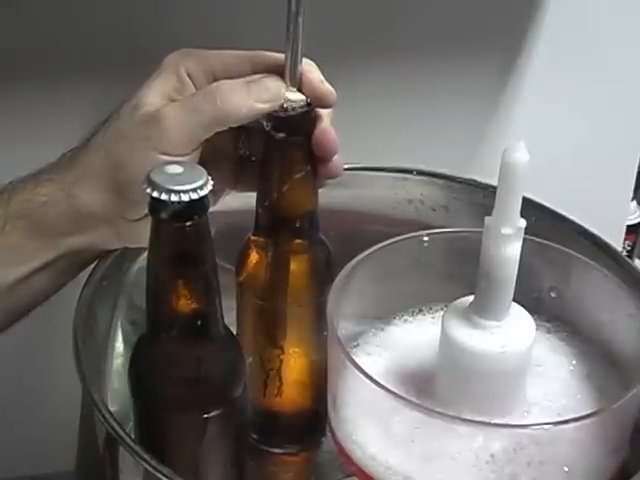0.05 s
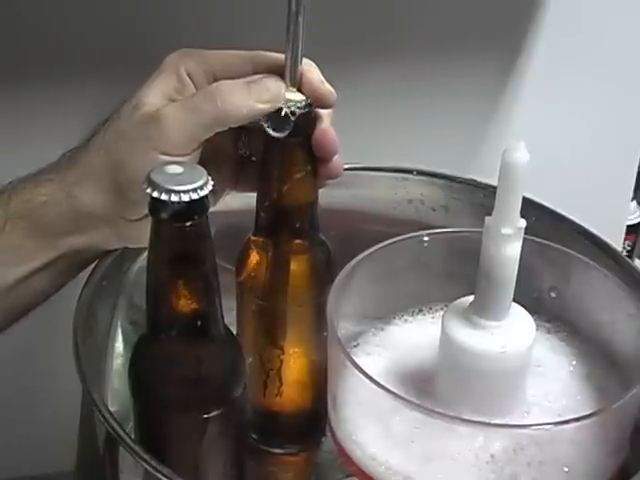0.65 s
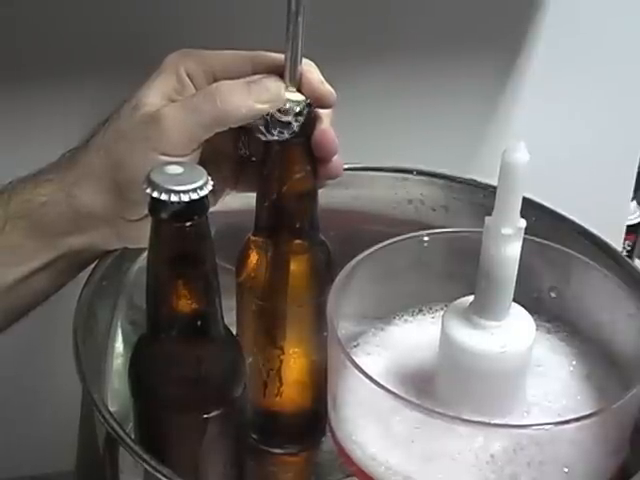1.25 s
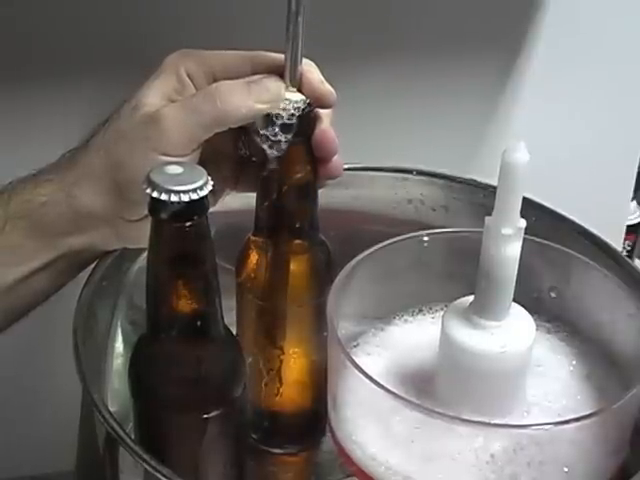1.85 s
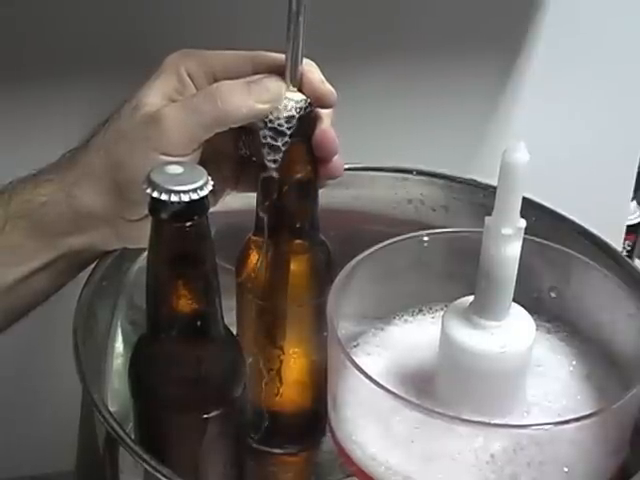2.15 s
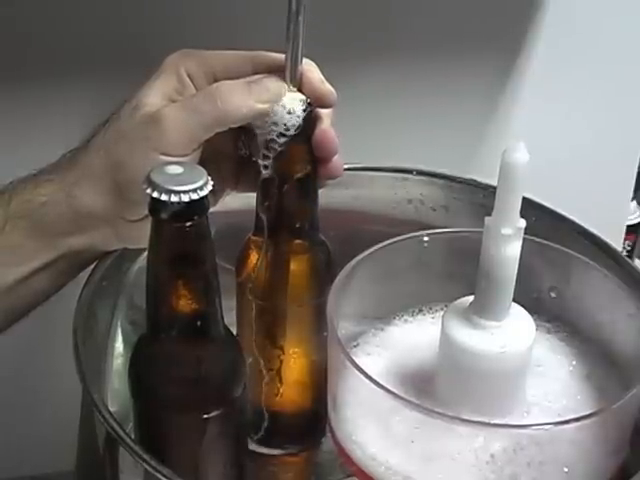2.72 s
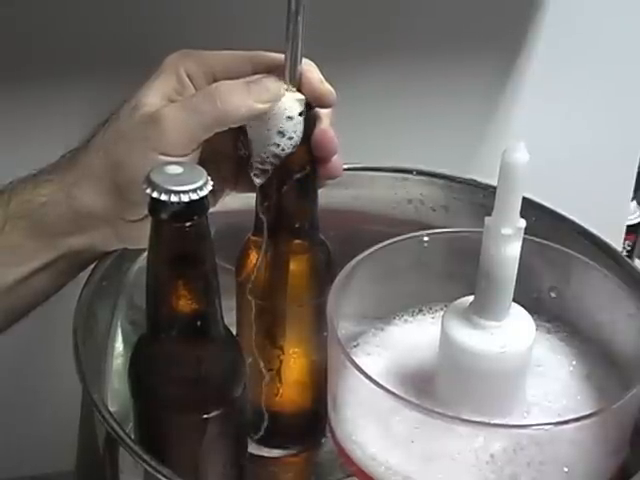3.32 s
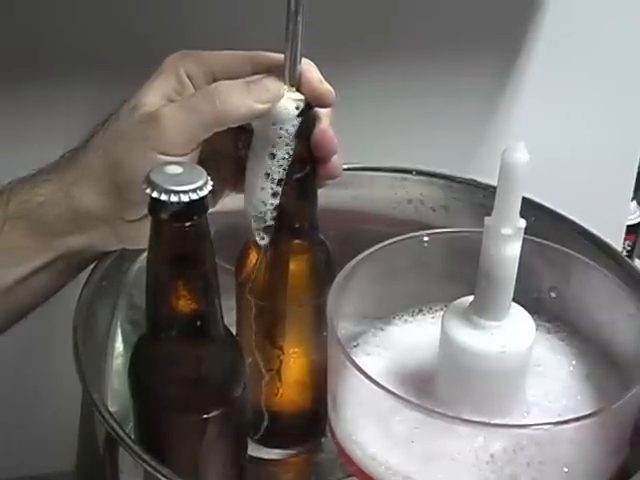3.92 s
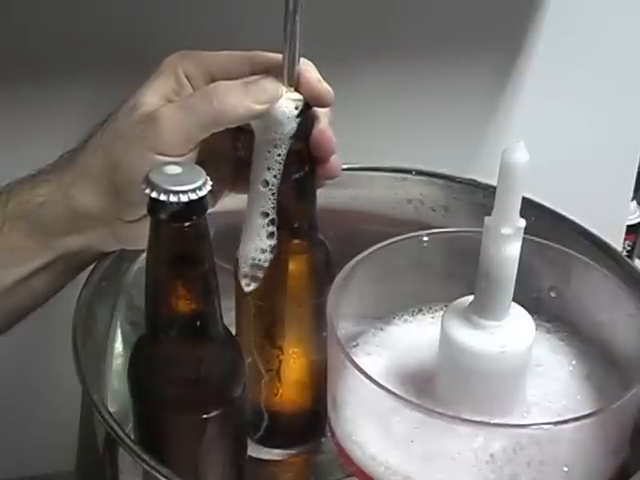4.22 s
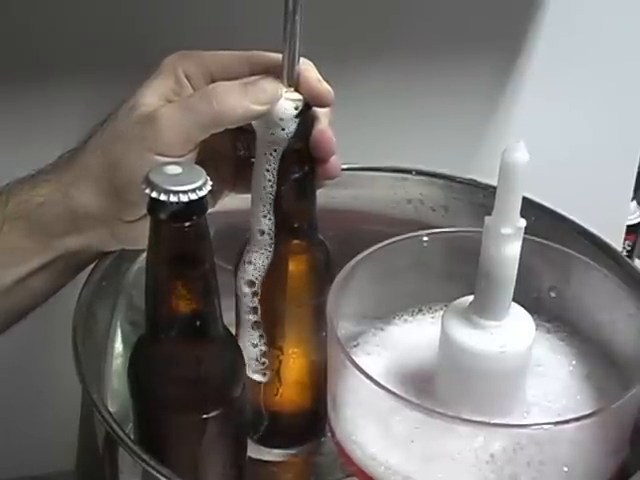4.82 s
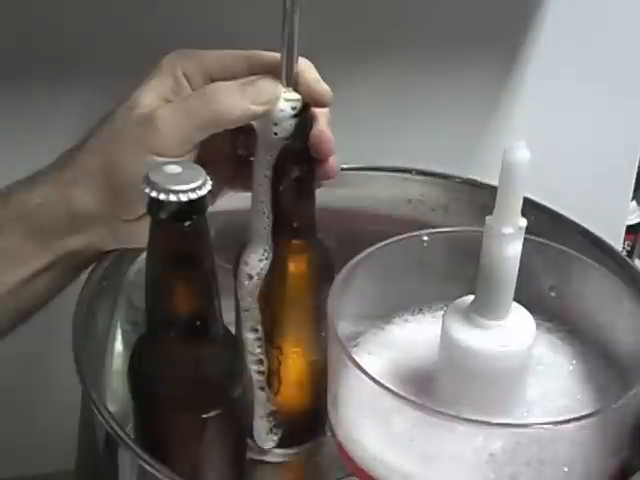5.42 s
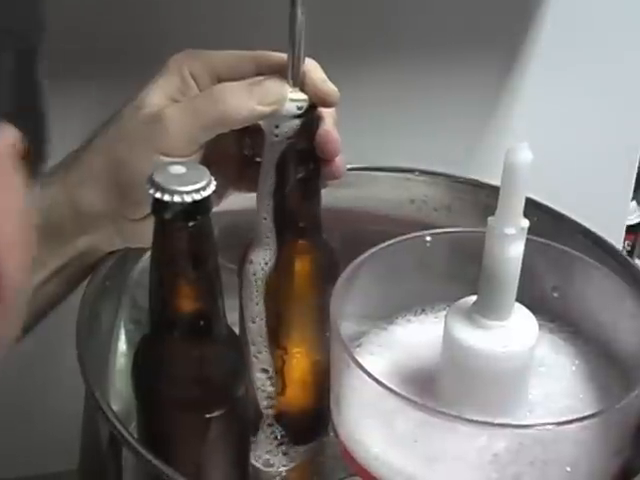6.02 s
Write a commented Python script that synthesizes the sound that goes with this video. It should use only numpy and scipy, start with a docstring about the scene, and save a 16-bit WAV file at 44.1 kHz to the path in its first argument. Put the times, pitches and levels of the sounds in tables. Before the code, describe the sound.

Gas sputters and hisses out of a glass bottle being filled, turning to crackling foam and fading to a thin whistle.

```python
"""An appliance hums in a small room while a beer bottle is filled from a tap tube inside a steel tub.
A thumb holds the stopper in, and gas escapes past it in a sputtering, spitting hiss.
Foam creeps into the gap: the hiss turns to crackle, the neck rings, foam gulps out and bubbles pop.
As the pressure runs down, the last gas fades with a thin whistle through a pinhole.
Then an arm brushes past and a few short hisses follow."""
import sys
import numpy as np
from scipy import signal
from scipy.fft import rfft, irfft, next_fast_len
from scipy.io import wavfile
from scipy.ndimage import map_coordinates

SR = 44100
rng = np.random.default_rng(int(sys.argv[2]) if len(sys.argv) > 2 else 0)


def generate_wav(sig):
    """Save sig (samples, or channels by samples) to the path in sys.argv[1] as 16-bit PCM at SR."""
    pcm = np.round(np.clip(np.atleast_2d(sig).T, -1, 1) * 32767).astype(np.int16)
    wavfile.write(sys.argv[1], SR, pcm)


N = 272097
TIME = np.arange(N) / SR
TOP_HZ = 15700


def amp(db):
    """Turns decibels into a gain."""
    return 10 ** (np.asarray(db) / 20)


def unit(x):
    """Scales x to an average strength (rms) of 1."""
    return x / np.sqrt(np.mean(x ** 2) + 1e-20)


def along(points, hz):
    """Reads between (frequency, value) points on a log frequency axis."""
    f, values = np.transpose(points)
    return np.interp(np.log(hz + 1), np.log(f), values)


def bell(x, centre, width, order=2):
    """A smooth bump of height 1; higher orders have flatter tops."""
    return .5 ** (np.abs(2 * (x - centre) / width) ** order)


def ramp(start, end):
    """0 before start, rising evenly to 1 at end."""
    return np.clip((TIME - start) / (end - start), 0, 1)


def wobble(rate):
    """A smooth curve through rate random values a second."""
    return map_coordinates(rng.standard_normal(int(N * rate / SR) + 4), [TIME * rate])


def noise():
    """White noise in two rows: mid (shared by both ears) and side (their difference)."""
    return rng.standard_normal((2, N))


def filtered(x, response):
    """Scales each frequency in x by response(hz)."""
    size = next_fast_len(N + SR // 2)
    return irfft(rfft(x, size) * response(np.fft.rfftfreq(size, 1 / SR)), size)[..., :N]


def coloured(x, spectrum):
    """Shapes x with a spectrum, at rms 1."""
    return unit(filtered(x, lambda hz: amp(along(spectrum, hz))))


def ringing(x, modes):
    """Passes x through resonances, at rms 1."""
    def response(f):
        return sum((-1) ** k * amp(db) * 1j * f * width / (hz * hz - f * f + 1j * f * width)
                   for k, (hz, width, db) in enumerate(modes))
    return unit(filtered(x, response))


def room(air_db=-46):
    """An appliance runs throughout: steady fan noise and a slightly wavering hum."""
    # motor and mains tones: f/Hz, level/dB
    tones = [(59.2, -50), (118.6, -54.5), (167.5, -47), (211, -54), (280, -55.5), (361, -56),
             (413.5, -56.5)]
    # fan noise spectrum: f/Hz, gain/dB
    spectrum = [(35, -26), (78, -27), (105, -1), (140, -9.5), (180, -1), (240, 1.5), (310, -6.5), (450, -4),
                (560, -11.5), (820, -8.5), (920, -12), (1100, -12.5), (1700, -17.5), (2200, -16.5),
                (12000, -28.5), (14500, -46)]
    hum = 0
    for hz, db in tones:
        gain = amp(db + 0.19 * wobble(2.93))
        hum += gain * np.sin(2 * np.pi * hz * TIME + 0.0022 * hz * wobble(5))
    return amp(air_db) * coloured(noise(), spectrum) + np.array([hum, np.zeros(N)])


def voice_db(dry_db, wet_gain_db, flow_power):
    """Level of one part of the leak, as foam wets the gap and the gas flow runs down."""
    # gas flow, falling with the pressure: t/s, level/dB
    flow = [(2.1, -17), (2.48, -22.5), (2.82, -22.5), (2.845, -23.5), (3.0, -24), (3.68, -29.5),
            (3.78, -35), (3.96, -34), (3.99, -31.5), (4.08, -38), (4.33, -45.5), (4.75, -47.5), (5.1, -56)]
    times, levels = np.transpose(flow)
    flow_db = np.interp(TIME, times, levels) - 28 * np.maximum(TIME - times[-1], 0)  # then dies away
    wetness = ramp(0.57, 2.64)
    return dry_db + wet_gain_db * wetness + flow_power * (flow_db - flow_db[0])


def fizz(rate, spread_db, share, size=40):
    """Rushing gas mixed with tiny bursting films, each a brief ring of its own pitch."""
    when, pitch, strength, phase = rng.random((int(rate * N / SR), 4)).T[:, :, None]
    k = np.arange(size)
    fades = amp(spread_db * strength ** 2) * np.exp(-np.pi * k / size)
    grains = fades * np.sin(2 * np.pi * (pitch * TOP_HZ * k / SR + phase))
    places = (when * N).astype(int) + k
    clicks = np.bincount(places.ravel(), grains.ravel(), N + size)[:N]
    pair = unit(np.array([clicks, np.roll(clicks, size)]))
    return np.sqrt(share) * pair + np.sqrt(1 - share) * noise()


def shifting(x, depth_db, width_hz=280, length_s=.045):
    """The wet gap keeps changing shape, so narrow peaks wander through the hiss."""
    hz, t, slices = signal.stft(x, SR, nperseg=512)
    where = np.meshgrid(hz / width_hz, t / length_s, indexing="ij")
    peaks = map_coordinates(rng.standard_normal(slices.shape[1:]), where, mode="nearest")
    return unit(signal.istft(slices * amp(depth_db * peaks), SR, nperseg=512)[1][:, :N])


def crackle(rate=130, length_s=0.00325):
    """Films tear at random moments, each letting a surge of gas through; gives a level curve."""
    tears = (rng.random(N) < rate / SR) * 1.0
    pulse = bell(TIME[:SR // 20], 1 / 40, length_s)
    surges = np.tanh(signal.fftconvolve(tears, pulse, "same"))
    return unit(surges - surges.mean())


def jet(change_db):
    """Gas rushing through the gap makes the main hiss."""
    # hiss spectrum: f/Hz, gain/dB
    spectrum = [(400, -58), (1300, -12.5), (2900, -11), (3300, -0.7), (4600, 3.5), (7600, 0.5), (9500, -7),
                (12000, -15), (16000, -46)]
    level_db = voice_db(dry_db=-22.5, wet_gain_db=0.099, flow_power=1.095) + change_db
    hiss = shifting(fizz(rate=3800, spread_db=11, share=0.42), depth_db=1.75)
    return amp(level_db) * coloured(hiss, spectrum)


def spray(change_db):
    """Spray adds a high sizzle that weakens as foam fills the gap."""
    # sizzle spectrum: f/Hz, gain/dB
    spectrum = [(3000, -44), (7000, 0), (9400, 2.5), (11200, 1.5), (12800, 0.5), (14800, -7), (15700, -31)]
    level_db = voice_db(dry_db=-22.5, wet_gain_db=-13, flow_power=0.79) + change_db
    sizzle = shifting(fizz(rate=3200, spread_db=10, share=0.48), depth_db=3.5)
    return amp(level_db) * coloured(sizzle, spectrum)


def leak():
    """Gas tears past the stopper; jet, spray, foam, neck and bottle share one sputtering flow."""
    # liquid briefly plugs the gap: t/s, length/s, jet dip/dB, spray dip/dB
    chokes = [(0.041, 0.068, 4, -1), (0.136, 0.042, 4.5, -0.5), (0.209, 0.013, 5, 4), (0.253, .022, 3, 9),
              (0.613, 0.076, 4, 11), (0.658, 0.011, 6, 8), (0.859, 0.043, 3.5, -0.5), (0.901, .045, -2, 8),
              (0.994, 0.034, -2.5, 11), (1.04, .03, 4.5, 3), (1.09, 0.041, 7, -3)]
    jet_dip_db = sum(db * bell(TIME, s, length, order=4) for s, length, db, _ in chokes)
    spray_dip_db = sum(db * bell(TIME, s, length, order=4) for s, length, _, db in chokes)
    sputter = np.interp(TIME, [2.6, 4.4], [1, .7])  # calms as the pressure is spent
    surge = crackle() * np.interp(TIME, [1.2, 2.2, 4.4], [.3, 1, .6])  # grows as foam arrives
    flow = amp(sputter * (0.28 * wobble(55) + 1.4 * wobble(230)))
    hiss = jet(1.8 * surge - jet_dip_db)
    hiss += spray(2.7 * surge + 2.6 * sputter * wobble(90) - spray_dip_db)
    hiss += foam(0.67 * surge + 0.53 * wobble(40))
    return flow * (hiss + neck() + bottle_ring())


def spits(width_hz=1000, flutter=0.23):
    """The gap blows clear in sudden spits that ring at its pitch while the liquid flutters."""
    # spits: t/s, length/s, f/Hz, level/dB
    clearings = [(0.037, .02, 12500, -24), (0.284, .025, 4770, -27), (0.468, .1, 5000, -29),
                 (0.641, 0.019, 4500, -23), (0.655, 0.04, 14200, -23), (0.689, 0.025, 5960, -19),
                 (0.722, .012, 7250, -24), (0.758, 0.016, 5000, -22), (0.805, 0.032, 7750, -25),
                 (0.905, 0.021, 4950, -23), (.908, .024, 7440, -24), (0.944, 0.016, 11600, -22),
                 (0.983, 0.039, 5150, -29), (1.094, 0.063, 10050, -24), (1.246, .11, 7650, -24),
                 (1.584, 0.19, 9250, -32), (1.728, .015, 12900, -23), (1.895, .05, 14000, -34),
                 (2.803, .035, 11800, -34), (5.353, .005, 9200, -47)]
    spurts = 0
    for s, length, hz, db in clearings:
        opening = [(hz, width_hz + 14 / length, 0)]  # shorter spits have a less clear pitch
        ring = ringing(ringing(noise(), opening), opening)
        spurts += amp(db) * bell(TIME, s, length, order=6) * ring
    return spurts * (1 + flutter * np.tanh(2 * wobble(220)))


def foam(change_db):
    """Foam creeping into the gap adds a lower fizz."""
    # fizz spectrum: f/Hz, gain/dB
    spectrum = [(300, -44), (700, -13), (1100, -13), (1750, -1.5), (2700, 1.5), (3400, -1.5), (4500, -5),
                (7000, -11), (15000, -50)]
    level_db = voice_db(dry_db=-41, wet_gain_db=13.66, flow_power=0.7) + change_db
    froth = shifting(fizz(rate=1800, spread_db=9, share=0.38), depth_db=1.5)
    return amp(level_db) * coloured(froth, spectrum)


def neck(opens_s=1.16, rise_s=0.042, settle_s=.17, width_hz=265, overtone_db=-14):
    """Air under the stopper sings like a pipe, sinking in pitch as foam fills the neck."""
    # the note swells and dips: t/s, length/s, gain/dB
    swells = [(1.39, 0.08, 2.5), (1.54, 0.17, -2.5), (1.637, 0.029, 6.5), (1.77, 0.041, 2.5),
              (2.34, 0.047, 5.5)]
    shut = 1 - ramp(opens_s - rise_s / 2, opens_s + rise_s / 2)
    level_db = voice_db(dry_db=-25.5, wet_gain_db=-1.2, flow_power=1.57) - 18 * shut
    level_db += sum(db * bell(TIME, s, length) for s, length, db in swells)
    pitch_hz = 3372 + 420 * np.exp(-np.maximum(TIME - opens_s, 0) / settle_s)
    phase = 2 * np.pi * np.cumsum(pitch_hz + 40 * wobble(14)) / SR
    ring = 0
    for k in range(3):
        # low noise, moved up to the note or an overtone
        band = filtered(noise(), lambda f: (f < 2 * width_hz) / (1 + 2j * f / width_hz))
        ring += amp(overtone_db * k) * (band[0] + 1j * band[1]) * np.exp(1j * (k + 1) * phase)
    return amp(level_db) * unit(np.array([ring.real, ring.imag]))


def bottle_ring():
    """The bottle rings along with the leak once it is full of foam."""
    # bottle resonances: f/Hz, width/Hz, gain/dB
    modes = [(1086, 500, -8), (1772, 207, 2.5), (3100, 670, -4), (4430, 1350, -6.5)]
    level_db = voice_db(dry_db=-67, wet_gain_db=37.8, flow_power=0.71) + 2.2 * wobble(80)
    return amp(level_db) * ringing(noise(), modes)


def gulps():
    """Slugs of foam squeeze past the stopper in soft, throaty pulses."""
    # slugs of foam: t/s, length/s, level/dB
    slugs = [(2.102, 0.26, -30.5), (2.638, 0.023, -31), (2.886, 0.043, -27), (2.997, 0.026, -29),
             (3.863, 0.023, -37.5), (4.302, 0.027, -42.5), (4.54, 0.032, -43), (4.763, 0.016, -41.5)]
    # throaty spectrum: f/Hz, gain/dB
    spectrum = [(700, -24), (1700, -4.5), (2600, -0.5), (6000, -21.5)]
    push = sum(amp(db) * bell(TIME, s, length, order=3) for s, length, db in slugs)
    return push * coloured(noise(), spectrum)


def pops(fade_s=0.04, rise_s=.003, level_db=-15):
    """Each larger bubble bursts in a quickly dying puff, its edge softened by the foam."""
    # bursting bubbles: t/s, relative level/dB
    bubbles = [(2.2907, -1.5), (2.366, -10), (2.466, 0), (2.7107, -4), (2.954, -2.5), (3.203, -5),
               (3.5294, -16), (3.988, -10)]
    spectrum = [(500, -32), (1600, -13), (4500, 5.5), (9000, -5), (15000, -15)]  # f/Hz, gain/dB
    bursts = 0
    for s, db in bubbles:
        onset = ramp(s - rise_s / 2, s + rise_s / 2)
        bursts += onset * amp(db + level_db - 60 * np.abs(TIME - s) / fade_s)
    return bursts * coloured(noise(), spectrum)


def whistle(start_s=2.4, end_s=5.02, edge_s=0.25, fade_db_per_s=3):
    """The last gas sings through a pinhole in narrow, airy tones that slowly fade and then stop."""
    # pinhole resonances: f/Hz, width/Hz, gain/dB
    modes = [(8140, 100, 0), (12900, 90, -7.5), (7090, 55, -1), (5770, 55, -3), (6450, 50, -5),
             (10500, 90, -9)]
    gate = ramp(start_s, start_s + edge_s) - ramp(end_s - edge_s, end_s)
    level_db = -47.5 - fade_db_per_s * (TIME - start_s) + 1.6 * wobble(26)
    return gate * amp(level_db) * ringing(noise(), modes)


def sleeve(at_s=5.305, length_s=0.25, level_db=-48):
    """A sleeve swishes softly as the arm reaches across."""
    # swish spectrum: f/Hz, gain/dB
    spectrum = [(400, -13), (1100, -9), (2300, -2.5), (3500, -10), (7000, -13), (14000, -26)]
    return amp(level_db) * bell(TIME, at_s, length_s, order=4) * coloured(noise(), spectrum)


def puffs():
    """Short smooth hisses, each with its own brightness."""
    # late hisses: t/s, length/s, level/dB, treble lift/dB
    hisses = [(5.551, 0.021, -54, 1), (5.669, 0.04, -40, 1), (6.014, 0.14, -39.6, -3.5),
              (6.165, 0.047, -46.5, 0)]
    # their spectrum: f/Hz, gain/dB
    spectrum = [(500, -19), (1300, -12), (2700, -10), (4800, -1), (6200, -8), (9300, -2), (12000, -6),
                (15000, -22)]
    sound = 0
    for s, length, db, lift_db in hisses:
        hiss = coloured(coloured(noise(), spectrum), [(5500, 0), (9500, lift_db)])
        sound += amp(db) * bell(TIME, s, length, order=4) * hiss
    return sound


def tub(x, fade_s=0.097, ring_db=-7):
    """Near surfaces colour the sound, and the steel walls add a short, hollow ring."""
    # echoes from tub and wall add up or cancel: f/Hz, width/Hz, gain/dB
    bands = [(590, 100, -8), (880, 90, -3), (1210, 80, -6), (1510, 200, -2.5), (1730, 190, 1),
             (2020, 150, -3.5), (2610, 70, 3), (2720, 50, -3), (2960, 100, -8), (3190, 130, 1.5),
             (3530, 130, 1.5), (3770, 120, -4.5), (4160, 170, -5), (4680, 150, 1.5), (4860, 90, -3),
             (5240, 140, 3.5), (5730, 130, -3.5), (6400, 150, -4), (7720, 100, -4.5), (8900, 380, -5),
             (10480, 400, 2), (10830, 120, -4), (11200, 260, 1.5)]
    near = filtered(x, lambda f: amp(sum(db * bell(f, hz, width) for hz, width, db in bands)))
    t = np.arange(SR // 4) / SR
    tail = rng.standard_normal((2, len(t))) * amp(-60 * t / fade_s)
    tail /= np.linalg.norm(tail[0])
    return near + amp(ring_db) * signal.fftconvolve(near, tail, axes=1)[:, :N]


def stereo(pair):
    """Turns mid and side into left and right at two close microphones of unequal sensitivity."""
    # how alike the two channels are: f/Hz, likeness (1 = the same)
    likeness = [(60, 0.91), (600, 0.77), (1700, 0.92), (5000, 0.79), (8500, 0.92), (13000, 0.92)]
    # microphone balance: f/Hz, left minus right/dB
    balance = [(200, 4.9), (700, 4.2), (1750, 2.6), (2400, -2.8), (3400, -2.6), (4600, 2), (8000, 1),
               (15000, .7)]

    def weights(hz):
        angle = np.arccos(along(likeness, hz)) / 2
        return np.array([np.cos(angle), np.sin(angle)])
    mid, side = filtered(pair, weights)
    left_right = np.array([mid + side, mid - side])
    return filtered(left_right, lambda hz: amp(np.outer([.5, -.5], along(balance, hz))))


def scene():
    """The bottle in its tub, the room and the small late sounds."""
    bottle = tub(leak() + spits() + gulps() + pops()) + whistle()
    lean_right = amp([[-1.3], [1.3]])
    return stereo(bottle + sleeve() + room()) + lean_right * stereo(puffs())


def record(dry):
    """Cuts away the treble above TOP_HZ."""
    return filtered(dry, lambda hz: hz < TOP_HZ)


dry = scene()
out = record(dry)
generate_wav(out)
```